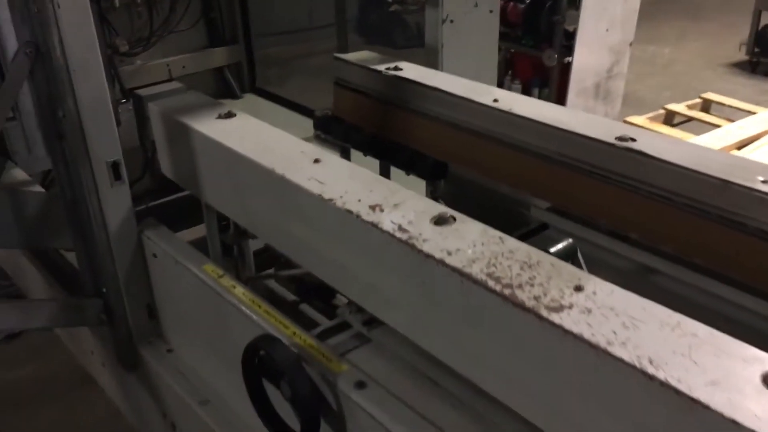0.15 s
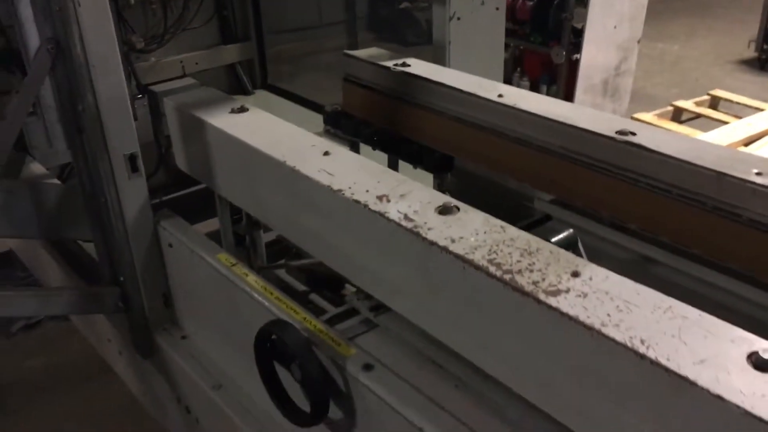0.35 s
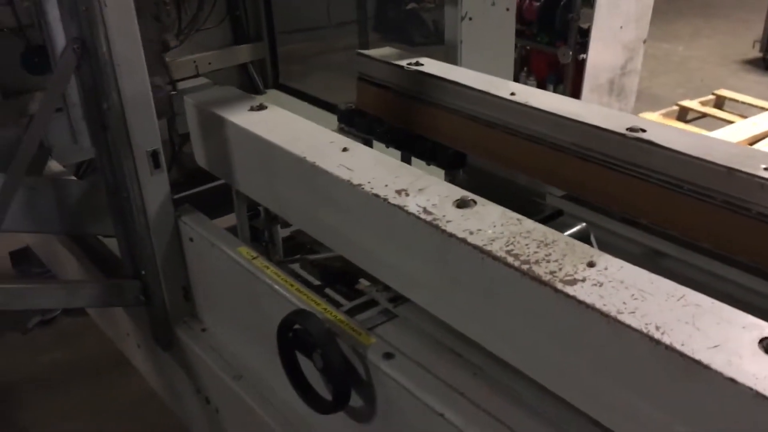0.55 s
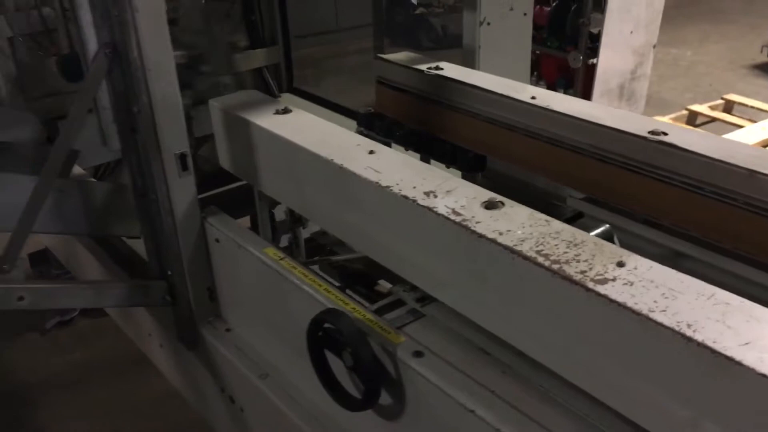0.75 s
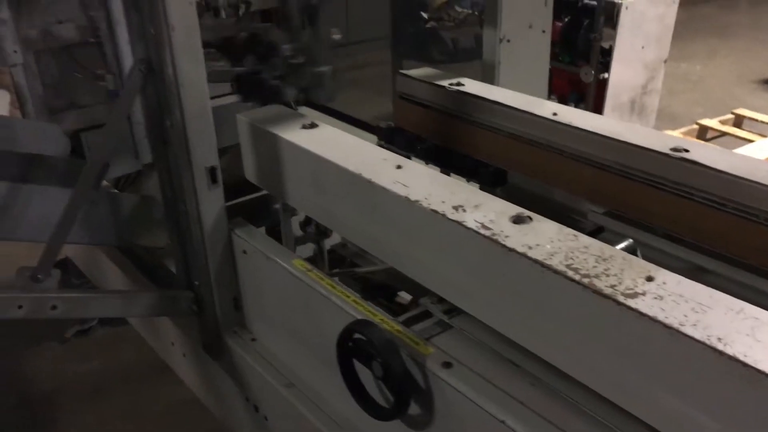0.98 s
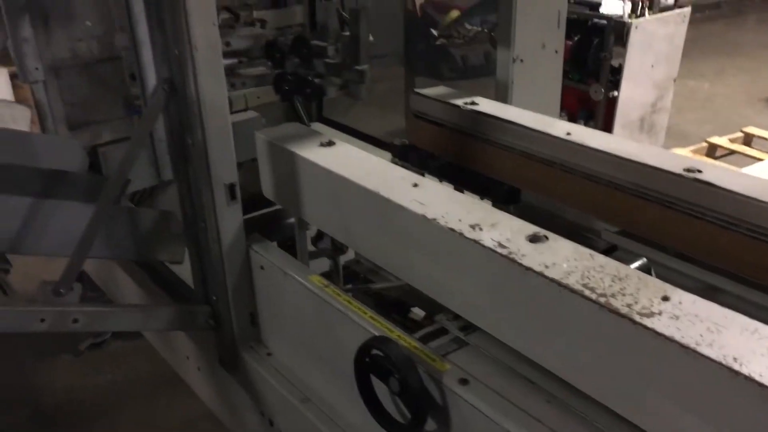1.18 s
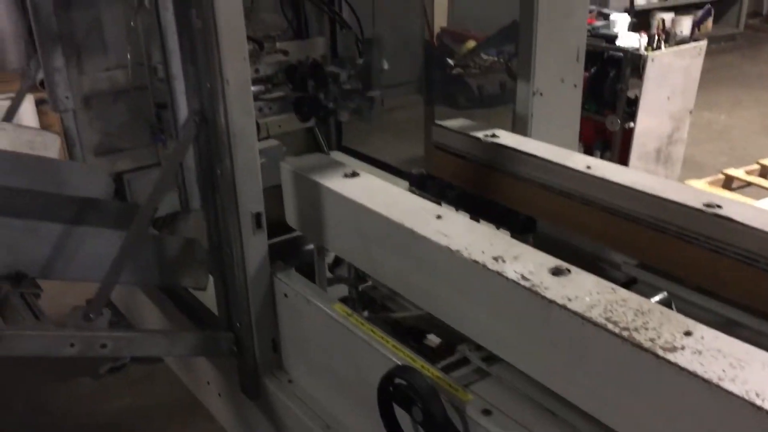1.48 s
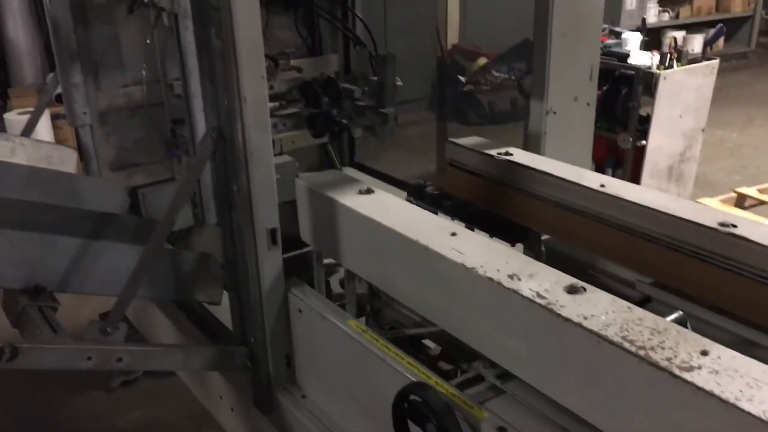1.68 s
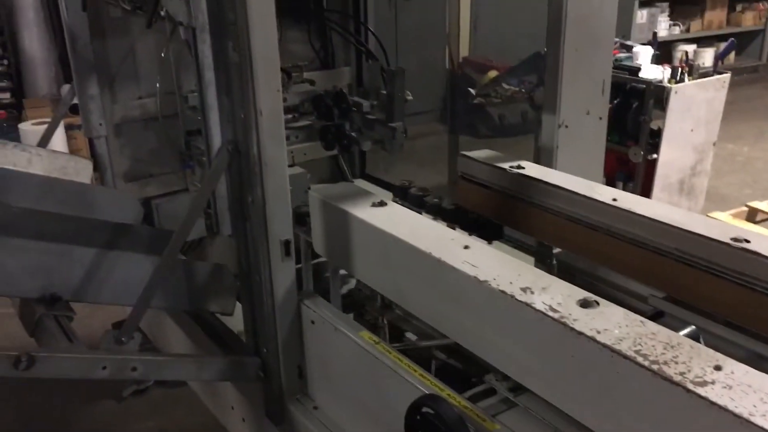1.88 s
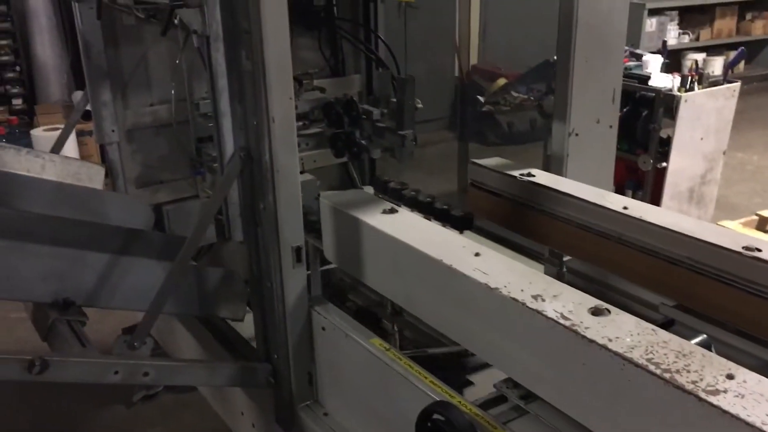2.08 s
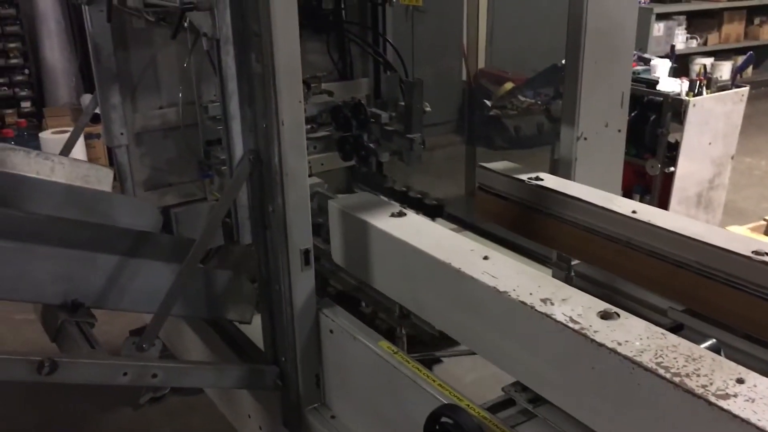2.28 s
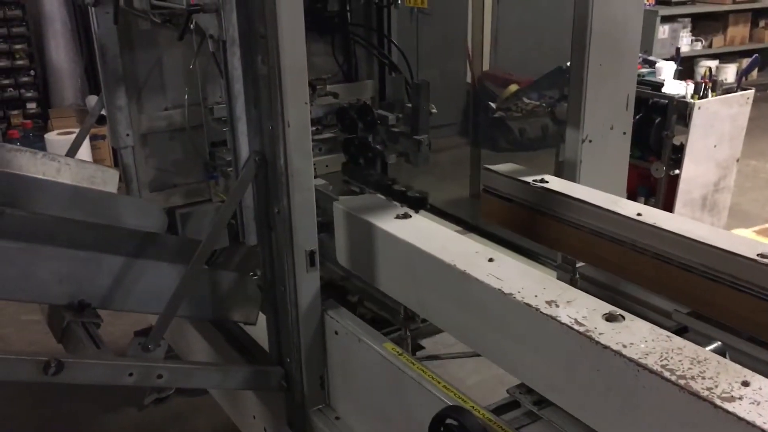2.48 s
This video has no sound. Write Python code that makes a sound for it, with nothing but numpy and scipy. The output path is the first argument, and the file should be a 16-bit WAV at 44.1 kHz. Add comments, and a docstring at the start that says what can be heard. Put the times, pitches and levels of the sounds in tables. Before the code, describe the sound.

After a brief quiet hum, a valve snaps open and air blasts in a bright, rough hiss, with low rumbles and faint scrapes beneath, stopping abruptly before a clack and heavy thud; near microphone, reverberant warehouse.

```python
"""A warehouse hums (filtered noise, wavering sines) throughout; a packaging-machine valve leaks, then pops open.
Compressed air roars from a nozzle for two seconds: lumpy noise through jet spectra and cavity resonances.
Meanwhile the frame rumbles (resonated noise) and thuds (decaying modes), and parts scrape (noise bursts).
The last air squeaks through the closing gap, the valve shuts, and a metal part clacks home amid thuds.
Jet and knocks echo off nearby clutter and the long hall (decaying noise tails)."""
import sys
import numpy as np
from scipy import signal
from scipy.fft import rfft, irfft, next_fast_len
from scipy.io import wavfile
from scipy.ndimage import uniform_filter1d, map_coordinates

SR = 44100
rng = np.random.default_rng(int(sys.argv[2]) if len(sys.argv) > 2 else 0)


def materialize(psi):
    """Save the field psi as 16-bit PCM at rate SR to the path in sys.argv[1].

    A 1-D psi becomes a single channel; in a 2-D psi each row is a channel.
    """
    bounded = np.clip(np.atleast_2d(psi).T, -1, 1)
    quanta = np.round(bounded * 32767).astype(np.int16)
    wavfile.write(sys.argv[1], SR, quanta)


def amplitude_ratio(level_db):
    """Convert a level in decibels to the matching linear amplitude (field) ratio."""
    exponent = np.asarray(level_db, float) / 20
    return 10 ** exponent


N = 116865
OPEN_S = 0.230  # valve snaps open


def unit(x):
    """Scale to rms 1."""
    return x / np.sqrt(np.mean(x ** 2) + 1e-20)


def along(points, hz):
    """Interpolate (f/Hz, value) points on a log-frequency axis."""
    f, v = np.transpose(points)
    return np.interp(np.log(hz + 1), np.log(f + 1), v)


def curves(rows):
    """One value per sample for each column after the time."""
    s, *cols = np.transpose(rows)
    return [np.interp(np.arange(N) / SR, s, c) for c in cols]


def wobble(knots_per_s):
    """Smooth random curve through normal knots, at most 2000 a second."""
    knots = rng.standard_normal(int(N * 2000 / SR) + 4)
    return map_coordinates(knots, [np.arange(N) * min(knots_per_s, 2000) / SR])


def filtered(x, response):
    """Apply a complex response of frequency, zero-padded."""
    m = next_fast_len(N + SR // 2)
    return irfft(rfft(x, m) * response(np.fft.rfftfreq(m, 1 / SR)), m)[:N]


def coloured(x, spectrum):
    """Shape x by (f/Hz, level/dB) points; rms 1."""
    return unit(filtered(x, lambda hz: amplitude_ratio(along(spectrum, hz))))


def patchy(patchy_db):
    """White noise with time-frequency patches of random gain."""
    z = signal.stft(rng.standard_normal(N), nperseg=512)[2]
    field = uniform_filter1d(rng.standard_normal(z.shape), size=6, axis=0)
    field = uniform_filter1d(field, size=10, axis=1)
    return signal.istft(z * amplitude_ratio(patchy_db * unit(field)), nperseg=512)[1][:N]


def burst(spectrum, start_s, t60_s):
    """Coloured noise that starts at once and decays exponentially."""
    t = np.arange(N) / SR - start_s
    decay = (t > 0) * amplitude_ratio(-60 * np.clip(t, 0, 1) / t60_s)
    return decay * coloured(rng.standard_normal(N), spectrum)


def warehouse():
    """Steady filtered noise plus motor sines of wavering level and phase."""
    # Background spectrum: f/Hz, relative level/dB
    air = [(15, -43), (25, 1), (80, 1.5), (129, -19), (169, -20), (247, -13), (275, -34), (323, -4),
           (447, -29.5), (900, -43.5), (1000, -15.5), (1670, -19.5), (15600, -37)]
    # Distant motors: f/Hz, nominal rms level/dB
    motors = [(120, -46.5), (326, -58), (890, -60)]
    air_db = -40.5
    t = np.arange(N) / SR
    hum = np.zeros(N)
    for hz, db in motors:
        level = np.sqrt(2) * amplitude_ratio(db + 1.45 * wobble(8.77))
        hum += level * np.sin(2 * np.pi * hz * t + 0.63 * wobble(9.5))
    return hum + amplitude_ratio(air_db) * coloured(patchy(patchy_db=0.5), air)


def rumble():
    """Moving parts shake the frame: lumpy noise through parallel band-pass resonances."""
    # Rumble of moving parts: t/s, level/dB
    travel = [(0.28, -42), (0.4, -58), (0.44, -25), (0.51, -35), (0.55, -32.5), (0.58, -47), (0.63, -40),
              (0.69, -49), (1.04, -48.5), (1.09, -32), (1.27, -49), (1.39, -24.5), (1.42, -28), (1.48, -22),
              (1.52, -27.5), (1.63, -29.5), (1.65, -32), (1.69, -29.5), (1.71, -32), (2.03, -35.5),
              (2.1, -44.5), (2.41, -33), (2.44, -31.5), (2.48, -35), (2.52, -29), (2.65, -34)]
    # Frame resonances: f/Hz, width/Hz, relative level/dB
    resonances = [(74, 83, -2), (132.4, 28.4, 4), (184.6, 16.7, 1), (261, 97, -5), (514, 450, -13),
                  (1080, 1050, -17)]
    lumps_db, lumps_per_s = 1, 30

    def frame(f):
        total = 0
        for k, (c, width, db) in enumerate(resonances):
            band = 1j * f * width / (c * c - f * f + 1j * f * width)
            total = total + (-1) ** k * amplitude_ratio(db) * band  # alternating polarity
        return total

    level_db, = curves(travel)
    shake = rng.standard_normal(N) * amplitude_ratio(lumps_db * wobble(lumps_per_s))
    return amplitude_ratio(level_db) * unit(filtered(shake, frame))


def ring(modes, t, spread, contact_s):
    """One blow: decaying modes scattered by spread, the high ones weaker for a longer contact."""
    out = np.zeros(len(t))
    for (hz, db, t60_s), d in zip(modes, spread):
        level = amplitude_ratio(db + 2.15 * d - 60 * t / t60_s) / (1 + (hz * contact_s) ** 2)
        out += level * np.sin(2 * np.pi * hz * (1 + 0.031 * d) * t + 2 * d)
    return out


def thuds():
    """Blows ring the frame modes; longer contact gives a slower, duller onset."""
    # Blows: t/s, relative level/dB, contact/ms
    blows = [(.429, -18.5, 1.3), (0.478, -16, 5.5), (0.53, -41, 5.6), (0.611, -26, 10), (1.078, -30, 4),
             (1.129, -21, 6.6), (1.289, -30, 1.3), (1.382, -17.5, 5.5), (1.43, -27.5, .8),
             (1.474, -21.5, 0.79), (1.579, -15.5, 4.7), (1.679, -17, 4.1), (1.798, -27, 2),
             (2.429, -21, 2.2), (2.515, -19.5, 6.4), (2.533, -4, 15)]
    # Frame modes: nominal f/Hz, nominal level/dB, t60/s
    modes = [(83, 1, 0.094), (134.8, -4.5, 0.44), (183, -0.5, 0.19), (232, -6.5, .1), (276.8, 6, 0.11),
             (463, -20, .06), (940, -20, .04)]
    out, t = np.zeros(N + SR), np.arange(SR // 3) / SR
    for s, db, ms in blows:
        blow = ring(modes, t, rng.standard_normal(len(modes)), ms / 1000)
        onset = 1 - np.exp(-300 * t / ms)
        out[round(s * SR):][:len(t)] += amplitude_ratio(db) * blow * onset
    return out[:N]


def scrapes():
    """Parts brush past each other: decaying mid-band noise."""
    # Brushes: t/s, relative level/dB
    brushes = [(1.07, -44), (1.29, -49), (1.33, -29), (1.40, -47), (1.43, -31), (1.47, -32), (1.50, -32),
               (1.54, -33.5), (1.57, -32), (1.64, -30), (1.80, -31)]
    # Scrape spectrum: f/Hz, relative level/dB
    spectrum = [(200, -25), (400, -2), (700, 6), (1100, 3), (1600, -7), (2500, -29)]
    return sum(amplitude_ratio(db) * burst(spectrum, s, t60_s=0.1) for s, db in brushes)


def clacks():
    """A part seats and rattles: a coloured body knock plus a shorter white crack."""
    # Impacts: t/s, relative level/dB, share of bright crack (ratio, under crack_db)
    impacts = [(2.483, -30, .3), (2.4865, -20, 1.3), (2.492, -17, 0.35), (2.501, -23, .1), (2.508, -25, .1),
               (2.52, -27, 0.12)]
    # Body of the part: f/Hz, relative level/dB
    body = [(150, -33), (300, 1), (700, -12), (1100, -11), (1400, 3.5), (1600, -4), (1850, -10),
            (2100, -3.5), (2550, -8), (2950, -2.5), (3400, -21), (4000, -11), (5500, -18), (8000, -30)]
    crack_db, crack_t60_s, knock_t60_s = -5, 0.023, 0.045
    out = np.zeros(N)
    for s, db, bright in impacts:
        crack = bright * amplitude_ratio(crack_db) * burst([(3000, 0)], s, crack_t60_s)  # flat spectrum
        out += amplitude_ratio(db) * (burst(body, s, knock_t60_s) + crack)
    return out


def squeak():
    """Last air squeezed through the closing gap: a treble noise burst."""
    # Squeak spectrum: f/Hz, relative level/dB
    spectrum = [(13500, -34), (14800, -3), (15500, 4), (17000, -12)]
    return amplitude_ratio(-24) * burst(spectrum, start_s=2.352, t60_s=0.15)


def pop():
    """Pressure front as the valve opens: a low-mid noise burst."""
    # Pop spectrum: f/Hz, relative level/dB
    spectrum = [(60, -26), (150, 8), (300, 5), (480, 0.5), (1000, -7), (1600, 0.5), (2500, -5), (5000, -30)]
    return amplitude_ratio(-13.5) * burst(spectrum, OPEN_S, t60_s=0.07)


def valve():
    """Gain of the opening: a thin leak, a snap open with a fast build-up, a steep cut at shutting."""
    leak_s, rise_s, shut_s = 0.218, 0.011, 2.41
    leak_db, open_db = -25, -15
    t = np.arange(N) / SR
    leak = (t > leak_s) * amplitude_ratio(leak_db)
    build_up = amplitude_ratio(open_db * np.exp(-np.abs(t - OPEN_S) / rise_s))
    shut = amplitude_ratio(-900 * np.clip(t - shut_s, 0, 1))
    return np.where(t > OPEN_S, build_up, leak) * shut


def jet():
    """Turbulent eddies, rougher at high flow, coloured as jet body and lip sizzle by nozzle cavities."""
    # Air flow: t/s, relative level/dB, sizzle re flow/dB (before sizzle_db)
    flow = [(0.25, -12.5, 2), (0.27, -14, 3.5), (0.5, -17.5, 2), (0.92, -17.5, 0), (1.28, -18.5, -1),
            (1.34, -17.5, 0.5), (1.36, -17.5, -0.5), (1.44, -17, 0), (2.27, -17.5, 0), (2.31, -16.5, -3),
            (2.34, -18.5, 1), (2.41, -35, -2), (2.46, -26, -8)]
    # Body of the jet: f/Hz, relative level/dB
    body_spectrum = [(260, -50), (450, -29.5), (474, -32), (520, -24), (762, -20), (870, -20.5),
                     (1210, -16.5), (1420, -13), (1510, -9), (1750, -6), (1920, -3.5), (2080, -7.5),
                     (2250, -7.5), (2700, -11.5), (3340, -1), (4460, -2), (4820, -6), (5580, 0.5),
                     (6450, -1), (7650, -11.5), (10500, -26), (13600, -34), (22000, -120)]
    # Fine turbulence at the lip: f/Hz, relative level/dB
    fine_spectrum = [(5880, -28), (10000, -9.5), (10600, -11), (11400, -1.5), (12700, 0.5), (13300, -1.5),
                     (15600, -11)]
    # Cavity resonances: f/Hz, width/Hz, lift/dB
    cavities = [(1926, 69, 2.5), (2170, 130, 3), (3270, 160, 0.5), (3900, 120, 1), (4230, 100, -0.5),
                (4630, 600, 2), (5270, 80, 2.5), (5450, 160, 1), (6700, 90, 0.5), (11750, 160, -4.5)]
    body_db, sizzle_db = 2, 0.5
    eddy_db, eddies_per_s = 0.5, 1400
    rougher_db_per_db = 0.34  # per dB of flow over its median

    def lift_db(hz):
        return sum(db / (1 + (2 * (hz - c) / width) ** 2) for c, width, db in cavities)

    def through_nozzle(x, spectrum):
        return unit(filtered(x, lambda hz: amplitude_ratio(along(spectrum, hz) + lift_db(hz))))

    flow_db, sizzle_re_flow_db = curves(flow)
    excess_db = np.clip(flow_db - np.median(flow_db), 0, 6)
    rough_db = (eddy_db + rougher_db_per_db * excess_db) * wobble(eddies_per_s)
    eddies = patchy(patchy_db=1.13) * amplitude_ratio(rough_db + 0.2 * wobble(13.3))
    body = amplitude_ratio(body_db) * through_nozzle(eddies, body_spectrum)
    fine = amplitude_ratio(sizzle_re_flow_db + sizzle_db) * through_nozzle(eddies, fine_spectrum)
    return valve() * amplitude_ratio(flow_db) * (body + fine)


def tail(t60_share):
    """Noise tail of energy 1, each frequency dying at its own speed."""
    # Hall decay: f/Hz, t60/s (times t60_share)
    hall = [(100, 1.1), (1200, 1.1), (2700, 1.8), (4000, 1), (5500, 1.43), (8000, 0.53), (15000, 0.2)]
    hz, t, z = signal.stft(rng.standard_normal(SR), SR, nperseg=256)
    t60_s = t60_share * along(hall, hz)[:, None]
    h = signal.istft(z * amplitude_ratio(-60 * t / t60_s), SR, nperseg=256)[1]
    return h / np.linalg.norm(h)


def room(x):
    """Direct sound plus short clutter echoes and the later, long hall."""
    near = amplitude_ratio(-15) * tail(t60_share=0.2)
    far = amplitude_ratio(-20) * np.roll(tail(t60_share=1), 600)  # samples
    return x + signal.fftconvolve(x, near + far)[:N]


def scene():
    """Echoing jet and knocks over the rumble and background."""
    machine = jet() + pop() + squeak() + thuds() + scrapes() + clacks()
    return (amplitude_ratio(-2.0) * room(machine) + rumble() + warehouse())[None]


def top_cut(x):
    """Nothing passes above the cut-off."""
    return signal.sosfilt(signal.butter(12, 15800, fs=SR, output="sos"), x)


def record(dry):
    """A phone microphone rolls off the deep bass (two 45 Hz poles) and rounds the peaks."""
    peak = 0.84
    x = filtered(dry[0], lambda hz: (1j * hz / (45 + 1j * hz)) ** 2)[None]
    mix = x / (1 + np.abs(x / peak) ** 4) ** (1 / 4)
    return top_cut(mix)


dry = scene()
out = record(dry)
materialize(out)
```